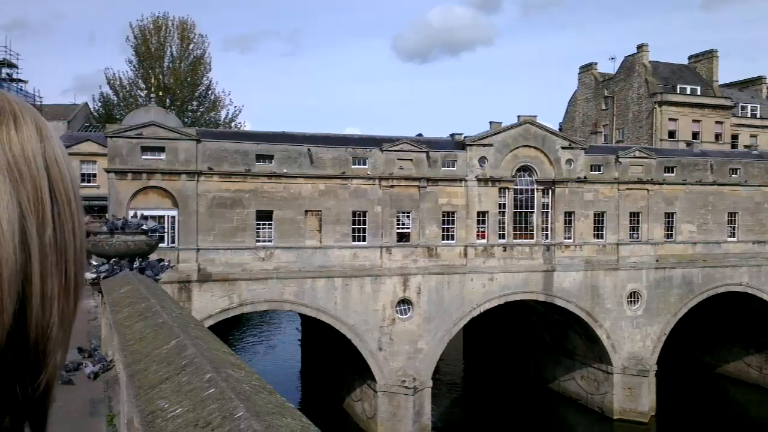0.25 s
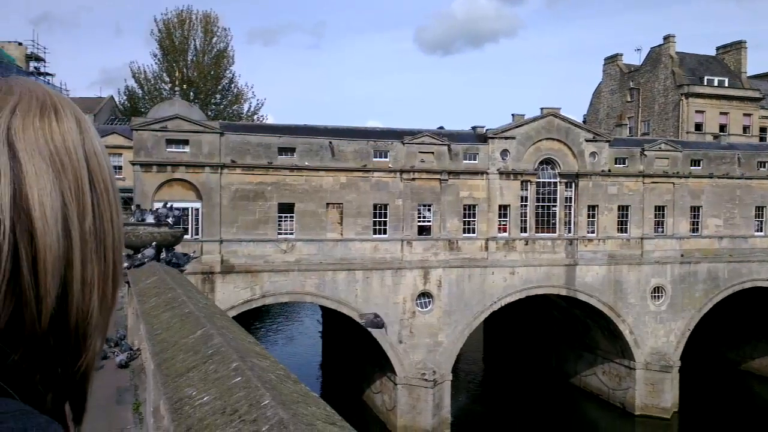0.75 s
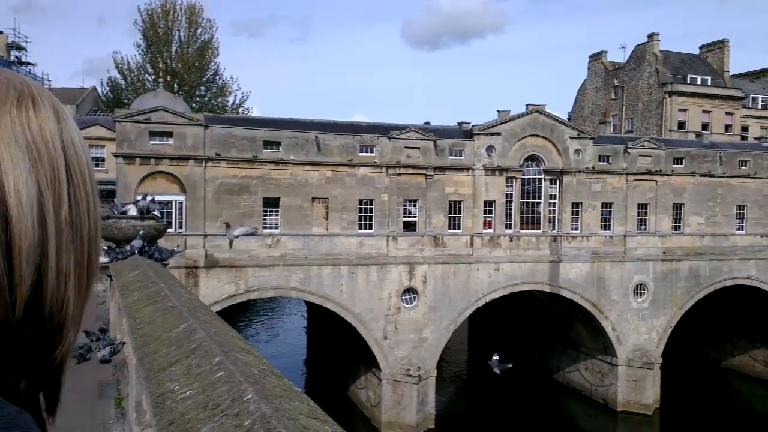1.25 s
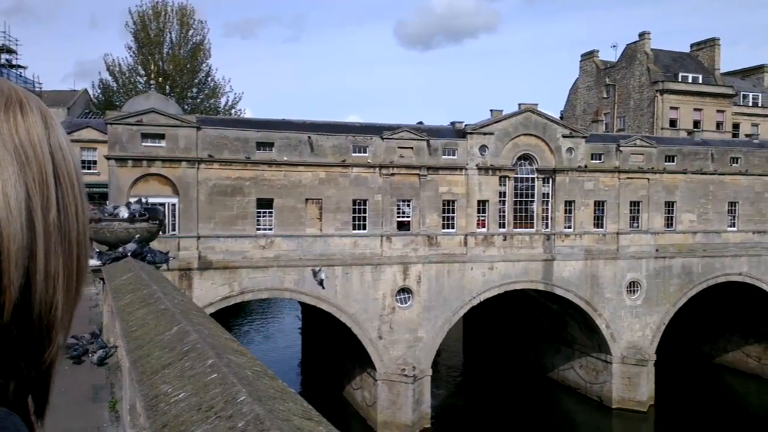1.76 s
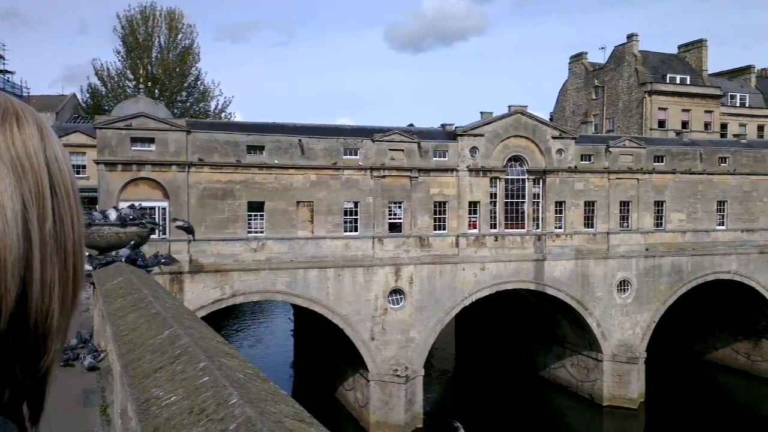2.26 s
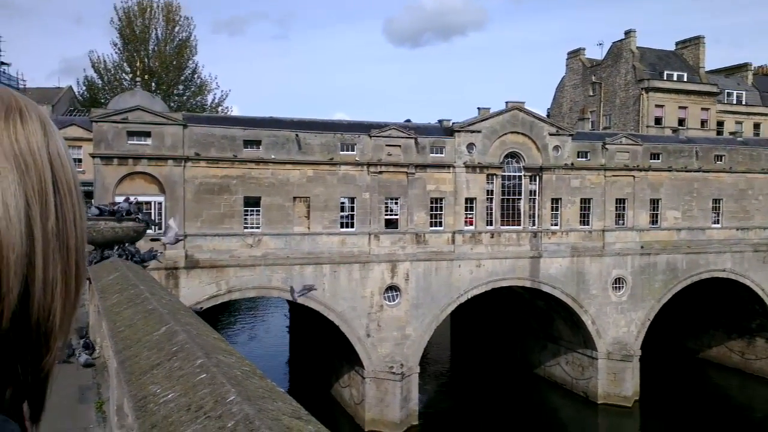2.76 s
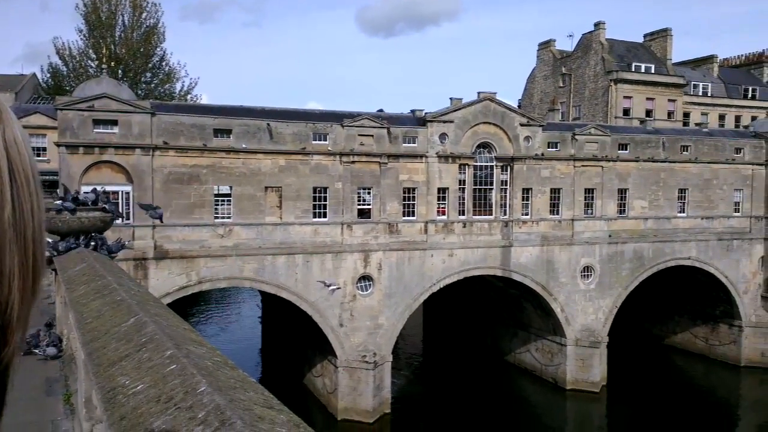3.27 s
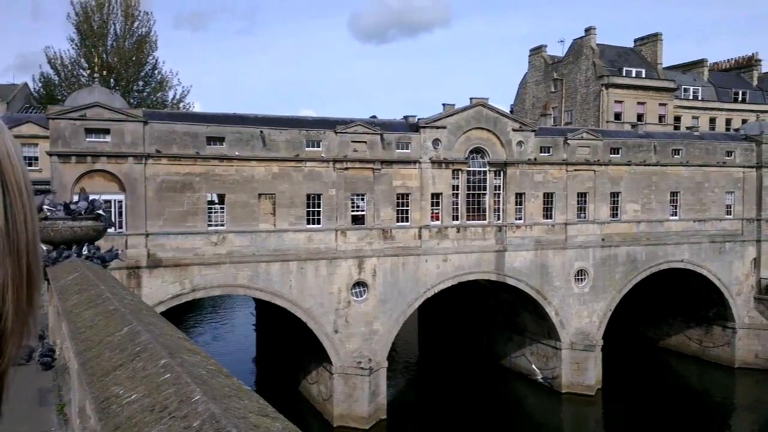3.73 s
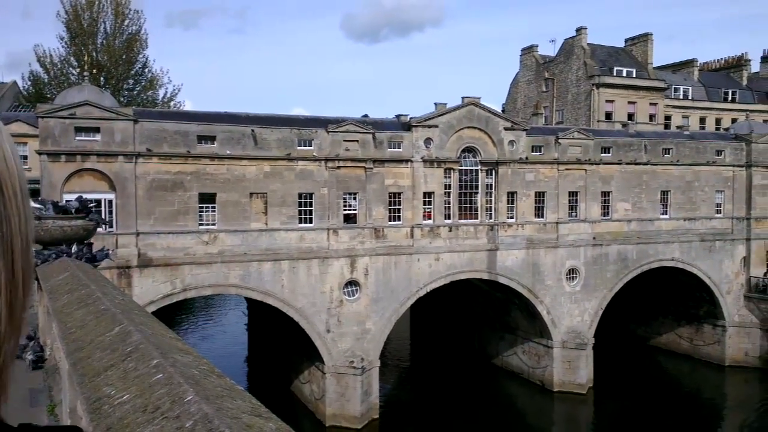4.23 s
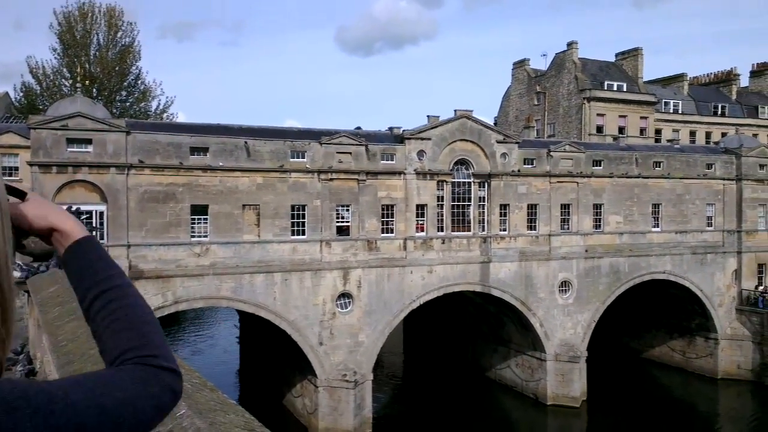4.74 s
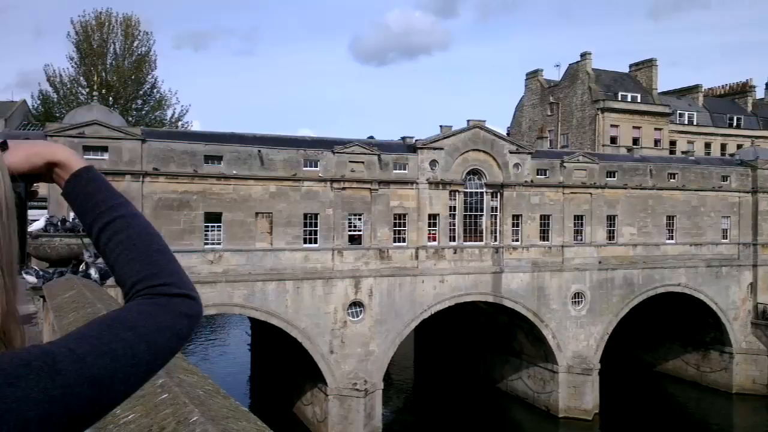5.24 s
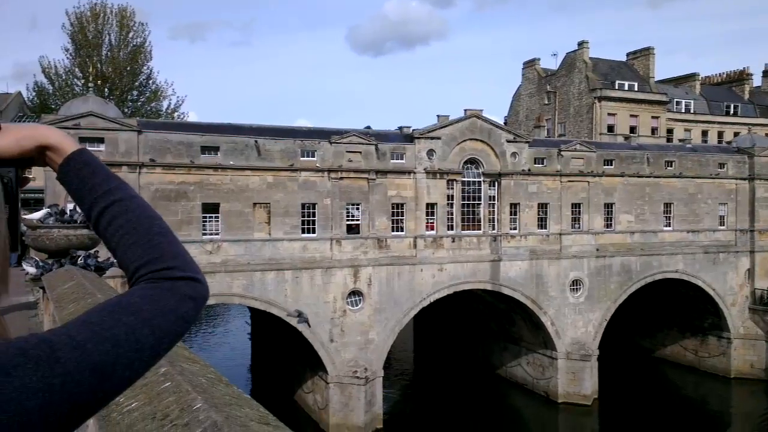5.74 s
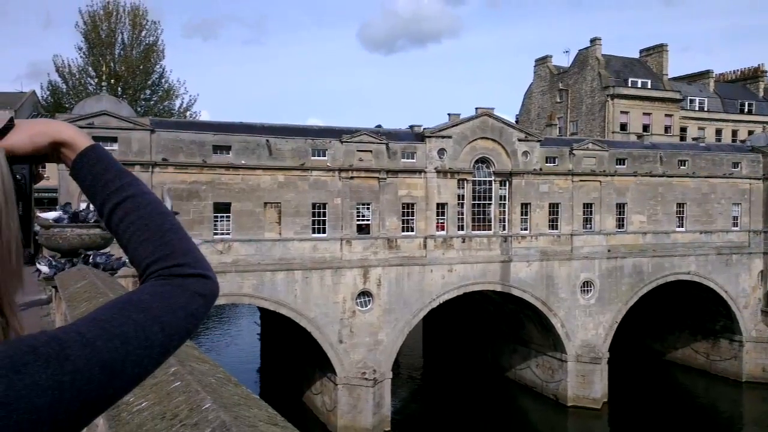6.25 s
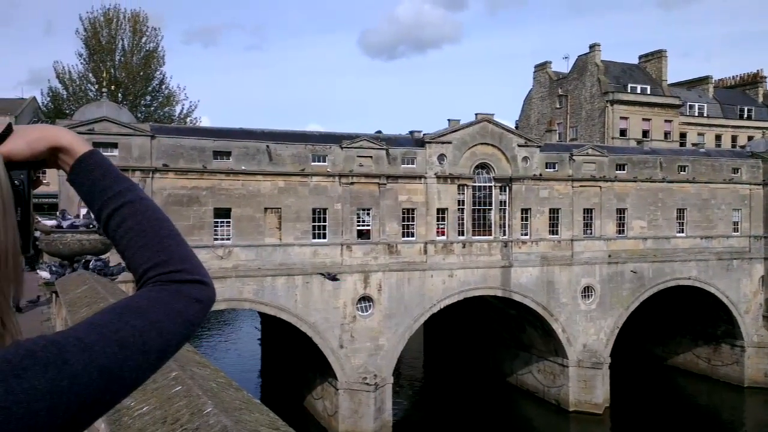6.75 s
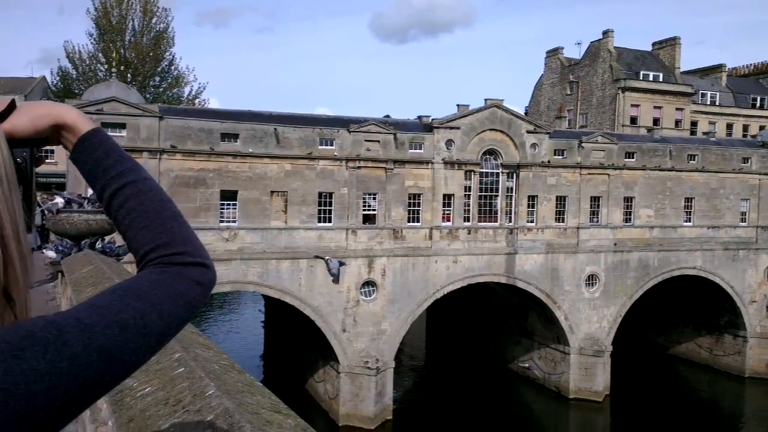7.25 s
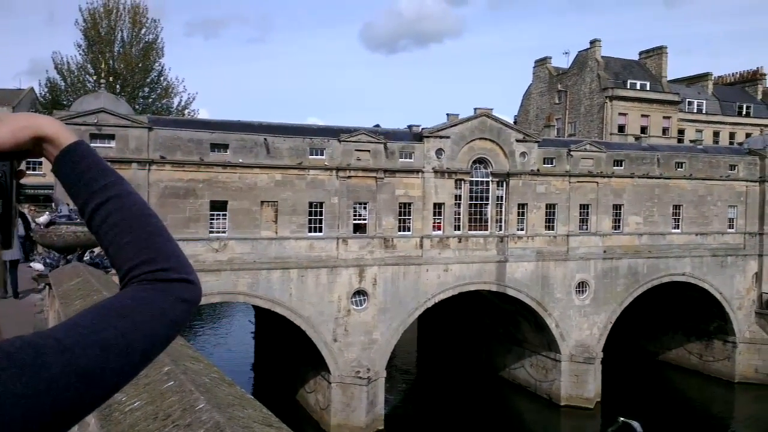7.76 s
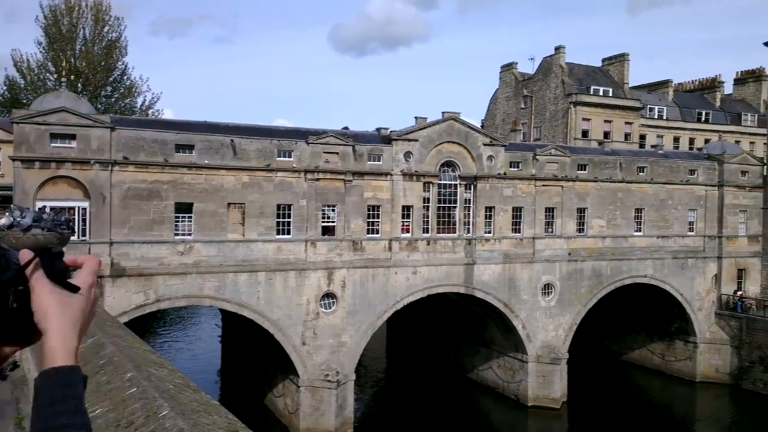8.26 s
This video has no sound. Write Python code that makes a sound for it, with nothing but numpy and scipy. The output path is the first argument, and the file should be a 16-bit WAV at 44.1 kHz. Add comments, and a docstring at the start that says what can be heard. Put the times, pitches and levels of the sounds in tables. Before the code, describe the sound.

Throughout about 8.5 seconds, a river pours over a weir: a dense, steady mid-range roar with little deep bass and a softer layer of fine spray, wide in stereo. From 0 to 1 s a heavy vehicle's air hiss fades on the left, with tiny, very high brake squeaks in the first 0.35 s and a faint rapid whirr that soon sinks away. A stronger air puff comes at 1.15-1.6 s. Between 1.25 and 2.8 s, irregular hollow knocks come from the street, smeared by stone walls, with one more at 3.15. Faint high bird peeps occur at 2.1 and 3.8 s. A stuttering brake squeal, near 1.3 kHz, sounds at 2.85-3.5 s, towards the right. Then mostly water, growing slightly after 7 s. Small close ticks fall at 3.2, 5.7, 6.0 with rustle, 7.1, 7.4, 7.6 and 8.35 s; two soft knocks at 7.7-7.8.

```python
"""A river pours over a weir in a town: noise and sparse drops, shaped by band into a roar with fine spray.
In the street a heavy vehicle lets off air (hiss puffs), its brakes sing (trembling sines) and something
knocks (noise bursts). Close by, small ticks are impulses with a rustle; a faint whirr of pulsed hiss and
two sine peeps of a bird lie behind. A short side echo widens the stereo; the treble ends at 15.3 kHz."""
import sys
import numpy as np
from scipy import signal
from scipy.fft import rfft, irfft, next_fast_len
from scipy.io import wavfile
from scipy.ndimage import uniform_filter1d

SR = 44100
rng = np.random.default_rng(int(sys.argv[2]) if len(sys.argv) > 2 else 0)


def dump(signal):
    """Clip the signal to [-1, 1] and save it as 16-bit WAV at the path in sys.argv[1]."""
    limited = np.clip(np.atleast_2d(signal).T, -1, 1)
    pcm = np.round(limited * 32767).astype(np.int16)
    wavfile.write(sys.argv[1], SR, pcm)


N = 374661
T = np.arange(N) / SR

# brake grabs on the high and the low note: (start [s], length [s], level [dB])
HIGH_GRABS = [(0, 0.055, -43), (0.077, .05, -50), (0.112, 0.065, -42), (0.19, .064, -43),
              (.305, 0.042, -44)]
LOW_GRABS = [(2.85, 0.075, -41), (2.915, 0.065, -36), (2.97, 0.105, -29.5), (3.08, .055, -38.5),
             (3.135, 0.035, -32), (3.185, .06, -35), (3.33, .16, -45.5)]


def gain_of(db):
    """Amplitude factor of a level in dB."""
    return 10 ** (np.asarray(db) / 20)


def evened(x):
    """Scales x to an RMS of 1."""
    return x / np.sqrt(np.mean(x ** 2) + 1e-20)


def smoothed(x, size, axis=-1):
    """Running mean over size samples."""
    return uniform_filter1d(x, size=size, axis=axis)


def curve(points, t):
    """Value at times t, linear between (time, value) points."""
    return np.interp(t, *np.transpose(points))


def read(points, hz):
    """A spectrum's value between its points, on a log-frequency axis."""
    point_hz, value = np.transpose(points)
    return np.interp(np.log(hz + 1), np.log(point_hz + 1), value)


def coloured(x, points):
    """Zero-phase filter to a spectrum, with a steep fall below half its first frequency."""
    size = next_fast_len(x.shape[-1])
    hz = np.fft.rfftfreq(size, 1 / SR)
    bass_cut = hz ** 3 / (hz ** 3 + (points[0][0] / 2) ** 3)
    spectrum = rfft(x, size) * gain_of(read(points, hz)) * bass_cut
    return irfft(spectrum, size)[..., :x.shape[-1]]


def panned(x, left_db):
    """Makes the left ear louder than the right by left_db."""
    return x * gain_of([[left_db / 2], [-left_db / 2]])


def pair(size, width):
    """Stereo noise, partly shared by the two channels."""
    mid, side = rng.standard_normal((2, size))
    return np.array([mid + width * side, mid - width * side])


def add(mix, start_s, sound):
    """Mixes a stereo sound in at start_s."""
    part = mix[:, round(start_s * SR):][:, :sound.shape[1]]
    part += sound[:, :part.shape[1]]


def envelope(t, length_s, attack_s, release_s):
    """Rises linearly from t = 0, holds until length_s, then decays exponentially."""
    rise = np.clip(t / attack_s, 0, 1)
    return rise * np.exp(-np.maximum(t - length_s, 0) / release_s)


def burst(shape, colour, width):
    """Coloured noise under an envelope, scaled by the RMS of the same noise unshaped."""
    noise = pair(len(shape), width)
    return coloured(noise * shape, colour) / np.std(coloured(noise, colour))


def whirr(beat_hz=25.4, puff_width_cycles=0.21):
    """Soft puffs of treble hiss in quick, even succession, to the left."""
    # (time [s], level [dB])
    whirr_level = [(0, -40.5), (.45, -48.5), (1.6, -53), (4.4, -55), (5.7, -55), (8.5, -48)]
    # (frequency [Hz], relative density [dB per Hz])
    whirr_colour = [(2500, 2), (4200, -4.5), (6500, -2.5), (9300, 1.5), (10400, -5.5), (11600, -23),
                    (14500, -48)]
    phase = (T * beat_hz + .1) % 1
    puffs = np.exp(-((phase - .5) / puff_width_cycles) ** 2)
    hiss = evened(coloured(pair(N, width=0.38) * puffs, whirr_colour))
    return panned(hiss * gain_of(curve(whirr_level, T)), left_db=12.5)


def peeps(fall_share=0.014, waver_rms_hz=90):
    """Thin, slightly falling notes of a far bird: sines with a wavering pitch."""
    # (start [s], mid pitch [Hz], length [s], peak level [dB])
    peep_notes = [(2.13, 7750, 0.049, -43), (3.78, 8000, 0.055, -43)]
    out = np.zeros((2, N))
    for start_s, pitch_hz, length_s, db in peep_notes:
        u = np.linspace(0, 1, int(length_s * SR))
        tremble = evened(smoothed(rng.standard_normal(SR), size=40))[:len(u)]
        hz = pitch_hz * (1 - fall_share * (u - .5)) + waver_rms_hz * tremble
        note = np.sin(2 * np.pi * np.cumsum(hz) / SR)
        add(out, start_s, panned(gain_of(db) * note * np.sin(np.pi * u), left_db=4))
    return out


def knocks():
    """Distant blows, smeared by the stone fronts of the street into decaying noise bursts."""
    # (start [s], level [dB], rise time constant [s], 60 dB decay time [s])
    blows = [(1.253, -30, 0.0028, 0.17), (1.32, -34, .005, 0.33), (1.472, -26, .003, 0.17),
             (1.53, -33, .005, .3), (1.562, -22, 0.0019, 0.18), (1.612, -26, .004, 0.33),
             (1.82, -25.5, .008, .2), (1.962, -24, 0.0053, .22), (2.035, -24, .007, 0.18),
             (2.14, -29, .003, 0.29), (2.24, -30, .006, 0.17), (2.338, -24.5, 0.007, .22),
             (2.485, -28, 0.0081, .22), (2.782, -25, .005, 0.16), (3.145, -28.5, .002, 0.36),
             (7.7, -28, .002, .2), (7.79, -29, .002, 0.17)]
    # (frequency [Hz], relative density [dB per Hz])
    knock_colour = [(150, -64), (450, 6), (800, 9.5), (1150, 10.5), (1600, 7.5), (2300, -6), (3500, -32),
                    (5000, -57)]
    out, t = np.zeros((2, N)), T[:SR // 2]
    lead = SR // 50  # silence ahead: room for the filter's pre-ringing
    for start_s, db, rise_s, t60_s in blows:
        decay = gain_of(-60 * t / t60_s)
        shape = np.pad(decay * (1 - np.exp(-t / rise_s)), (lead, 0))
        knock = gain_of(db) * burst(shape, knock_colour, width=0.56)
        add(out, start_s - lead / SR, panned(knock, left_db=-1.0))
    return out


def squeal_note(hz, waver_rms_hz):
    """A brake's mode: a sine of RMS 1 with a slight tremble in its pitch."""
    tremble = evened(smoothed(rng.standard_normal(N), size=300))
    return np.sqrt(2) * np.sin(2 * np.pi * np.cumsum(hz + waver_rms_hz * tremble) / SR)


def squeals(rise_cycles=120, fall_cycles=18, street_db=-5.5, street_cycles=280):
    """Each grab of a brake builds up its mode anew; the street keeps the note ringing."""
    # (pitch at first grab [Hz], glide [Hz/s], RMS tremble [Hz], left against right [dB], grabs)
    brakes = [(9395, 130, 18, 15, HIGH_GRABS), (1283, -3, 3, -10, LOW_GRABS)]
    out = np.zeros((2, N))
    for pitch_hz, glide_hz_per_s, waver_hz, left_db, grabs in brakes:
        levels = []
        for start_s, length_s, db in grabs:
            t = T - start_s
            rise_s = min(rise_cycles / pitch_hz, length_s / 2)
            direct = gain_of(db) * envelope(t, length_s, rise_s, fall_cycles / pitch_hz)
            ring = gain_of(db + street_db) * envelope(t, length_s, length_s, street_cycles / pitch_hz)
            levels.append(np.maximum(direct, ring))
        hz = pitch_hz + glide_hz_per_s * (T - grabs[0][0])
        out += panned(np.max(levels, axis=0) * squeal_note(hz, waver_hz), left_db)
    return out


def air_brake(attack_s=0.072, release_s=0.033, sag_db_per_s=10):
    """Compressed air hisses out to the left; each puff sags as its pressure drops."""
    # (start [s], length [s], level before sag [dB])
    puffs = [(-.1, 0.4, -36), (.34, 0.74, -44.5), (1.139, 0.42, -32.5), (1.275, 0.056, -38)]
    # (frequency [Hz], relative density [dB per Hz])
    air_colour = [(2500, -30), (4200, -5), (6500, -3.5), (8200, 0), (9500, 3.5), (10500, -4), (12000, -13),
                  (14000, -25), (15500, -40)]
    hiss = evened(coloured(pair(N, width=0.84), air_colour))
    flow = np.zeros(N)
    for start_s, length_s, db in puffs:
        t = T - start_s
        flow += gain_of(db - sag_db_per_s * t) * envelope(t, length_s, attack_s, release_s)
    return panned(hiss * flow, left_db=6.5)


def ticks(rustle_rise_s=0.0015, ring_db=7, ring_width_hz=1000, dispersion=0.52):
    """A sharp impulse with a duller rustle after it; each rings in a broad resonance of its own."""
    # (start [s], snap gain [dB], rustle level [dB], rustle decay [s], resonance [Hz],
    #  dull above [Hz], left against right [dB])
    tick_events = [(3.234, -29, -35, .012, 10500, 13000, 7), (5.722, -26, -33, .008, 8300, 11500, -8),
                   (6.002, -45, -34.5, 0.052, 8200, 10500, 6), (7.105, -5, -38, .007, 8500, 15000, -12),
                   (7.437, -18, -31, .007, 10500, 12500, -10), (7.443, -6, -33, .006, 5400, 12500, -12),
                   (7.617, -14, -28, 0.008, 5160, 13000, -3), (8.346, -14, -28, .007, 9500, 10500, -8),
                   (8.351, -8, -30, .005, 6000, 11000, -3.5)]
    # (frequency [Hz], gain [dB])
    tick_colour = [(800, -10), (3000, 1), (6000, -2), (9000, -2), (11500, -8), (14000, -11), (15500, -28)]
    # (frequency [Hz], relative density [dB per Hz])
    rustle_colour = [(800, -19), (3000, 10), (5500, -1), (9000, 0), (11500, -5), (15500, -38)]
    out, t = np.zeros((2, N)), T[:SR // 5]
    lead = SR // 100  # silence ahead: room for the filter's pre-ringing
    hz = np.geomspace(800, 15500, 60)
    # all-pass: the treble of a snap arrives just ahead of its bass
    impulse = signal.unit_impulse(lead + len(t), lead)
    impulse = signal.lfilter([-dispersion, 1], [1, -dispersion], impulse)
    for start_s, snap_db, rustle_db, rustle_s, ring_hz, dull_hz, left_db in tick_events:
        tone_db = ring_db * np.exp(-((hz - ring_hz) / ring_width_hz) ** 2)
        tone_db -= 10 * np.log10(1 + (hz / dull_hz) ** 16)
        snap = coloured(impulse, np.column_stack([hz, read(tick_colour, hz) + tone_db]))
        shape = np.pad(envelope(t, rustle_rise_s, rustle_rise_s, rustle_s), (lead, 0))
        rustle = burst(shape, np.column_stack([hz, read(rustle_colour, hz) + tone_db]), width=0.7)
        tick = gain_of(snap_db) * snap + gain_of(rustle_db) * rustle
        add(out, start_s - lead / SR, panned(tick, left_db))
    return out


def drops(per_s, spread_db):
    """Sparse impacts of random sign, most of them small; RMS 1."""
    hits = rng.random((2, N)) < per_s / SR
    signs = rng.choice([-1, 1], (2, N))
    size_db = spread_db * np.minimum(rng.exponential(1, (2, N)), 4)
    return evened(hits * signs * gain_of(size_db))


def swells(hz, t):
    """The dB by which brief swells lift their part of the water's spectrum; the short lifts near 8 kHz are soft
    rustles close by."""
    # (peak time [s], half-length to 1/e [s], centre [Hz], half-width to 1/e [octaves], lift [dB])
    lifts = [(1.097, .05, 850, 0.98, 2), (1.42, 0.65, 690, 1, 1.9), (1.613, 0.048, 750, 0.76, 4.5),
             (2.5, 0.19, 8000, 1, 3), (3.163, 0.023, 8000, .7, 3.5), (5.647, 0.098, 7600, 0.46, 4.5),
             (6.987, 0.11, 1790, 0.14, 4.5), (7.74, 0.042, 900, 0.44, 3), (8.14, 0.092, 680, 1, 3.5),
             (8.21, .025, 6500, 0.79, 3.5), (8.453, .03, 8000, 0.66, 7)]
    total_db = 0
    for peak_s, length_s, centre_hz, octaves, db in lifts:
        band = np.exp(-(np.log2((hz + 1) / centre_hz) / octaves) ** 2)
        total_db = total_db + db * np.outer(band, np.exp(-((t - peak_s) / length_s) ** 2))
    return total_db


def weir(level_db=-29, patchy_db=0.74, drop_share=0.37):
    """Countless bursting bubbles and drops; clumps of water fall unevenly over the sill."""
    # falling water, then spray: (frequency [Hz], relative density [dB per Hz])
    water_colour = [(30, -69), (70, -58), (125, -44.5), (200, -24), (290, -8), (390, -6.5), (475, -1.5),
                    (550, -2), (850, 1), (1100, -2.5), (1750, -3), (2300, -6)]
    spray_colour = [(3050, -2), (3550, -2.5), (4400, -15.5), (5200, -18), (7700, -19.5), (9400, -17.5),
                    (10200, -22.5), (11500, -34), (14500, -66)]
    # (frequency [Hz], side against mid [dB], lean to the left [-1..1])
    spread = np.array([(60, 11, -0.029), (310, -21, 0.082), (550, -7, 0.29), (790, -9.5, 0.36),
                       (1020, 1.5, 0.32), (1530, 1.5, 0.36), (2000, -4.5, -0.05), (2600, -3.5, -0.42),
                       (3430, -6, 0.038), (4070, -1.5, 0.066), (9500, -2, 0.2)])
    # strength of the rush, used about its mean: (time [s], level [dB])
    rush = [(0.1, -32.5), (1.07, -33), (1.12, -32.5), (2.48, -33), (3.01, -30), (3.78, -32), (3.91, -31.5),
            (6.66, -31.5), (7.04, -30), (7.19, -30.5), (7.38, -28.5), (7.59, -30.5), (7.61, -28.5),
            (8.1, -29.5), (8.17, -29), (8.4, -29.5)]
    # the deep plunge follows the rush least: (frequency [Hz], response [dB per dB of rush])
    follow = [(500, 0.27), (900, 0.5), (1800, 1.3), (3000, 1.46), (8000, 1.16)]
    # surges of large clumps: (frequency [Hz], RMS depth [dB])
    clumping = [(200, 1), (500, 0.5), (1500, 0.8), (3000, .5), (8000, 0.67)]
    # large bubbles gurgle in narrow bands, fine spray is smooth: (frequency [Hz], RMS depth [dB])
    gurgling = [(80, 6), (200, 1), (700, 1.22), (1500, 0.95), (3500, 0.84)]
    # a head close by colours the water until it moves off: (frequency [Hz], gain at share 1 [dB])
    head_colour = [(320, 1), (800, -1), (1400, 0), (1950, -6), (2600, 4.1), (3000, 0.7), (3500, -3),
                   (4400, 2), (7000, 1)]
    # (time [s], share [0..1])
    head_near = [(1.0, 0.83), (1.25, 0.27), (2.4, 0)]
    # slow drift between the ears: (time [s], left against right [dB])
    drift = [(.7, 0.5), (2.2, 2.5), (2.9, 0), (6, 0.8), (7.1, -1), (8.5, 0.5)]

    drive = rng.standard_normal((2, N)) + drop_share * drops(per_s=4000, spread_db=3)
    hz, t, (mid, other) = signal.stft(drive, SR, nperseg=1024, noverlap=768)
    # the part of the side signal that follows the mid pulls the sound to one ear
    lean = np.clip(read(spread[:, ::2], hz), -1, 1)[:, None]
    side_gain = gain_of(read(spread[:, :2], hz))[:, None]
    side = side_gain * (lean * mid + np.sqrt(1 - lean ** 2) * other)

    rush_db = curve(rush, t)
    flow_db = np.outer(read(follow, hz), rush_db - rush_db.mean())
    head_db = np.outer(read(head_colour, hz), curve(head_near, t))
    # small clumps lift a patch of the spectrum, large ones the whole of it
    patches = smoothed(smoothed(rng.standard_normal(mid.shape), size=24, axis=0), size=6, axis=1)
    patches_db = patchy_db * evened(patches)
    surges = evened(smoothed(rng.standard_normal(len(t)), size=7))
    surges_db = np.outer(read(clumping, hz), surges)
    gurgle = smoothed(smoothed(rng.standard_normal(mid.shape), size=6, axis=1), size=4, axis=0)
    gurgle_db = read(gurgling, hz)[:, None] * evened(gurgle)
    field = gain_of(flow_db + swells(hz, t) + head_db + gurgle_db + patches_db + surges_db)

    water = signal.istft(np.array([mid, side]) * field, nperseg=1024, noverlap=768)[1][:, :N]
    mid, side = coloured(water, water_colour + spray_colour)
    drift_db = np.outer([.5, -.5], curve(drift, T))
    return gain_of(level_db + drift_db) * np.array([mid + side, mid - side]) / np.std(mid)


def scene():
    """The weir, with the street and the small close sounds over it."""
    return whirr() + peeps() + knocks() + squeals() + air_brake() + ticks() + weir()


def record(dry, echo=0.26, edge_hz=15300):
    """Widens the stereo by repeating the side signal 2 ms later, then limits the treble."""
    delay = 89  # samples
    mid, side = (dry[0] + dry[1]) / 2, (dry[0] - dry[1]) / 2
    side = side + echo * np.pad(side, (delay, 0))[:N]
    low_pass = signal.firwin(511, edge_hz, window=("kaiser", 9), fs=SR)
    return signal.oaconvolve(np.array([mid + side, mid - side]), low_pass[None], "same", axes=1)


dry = scene()
out = record(dry)
dump(out)
```